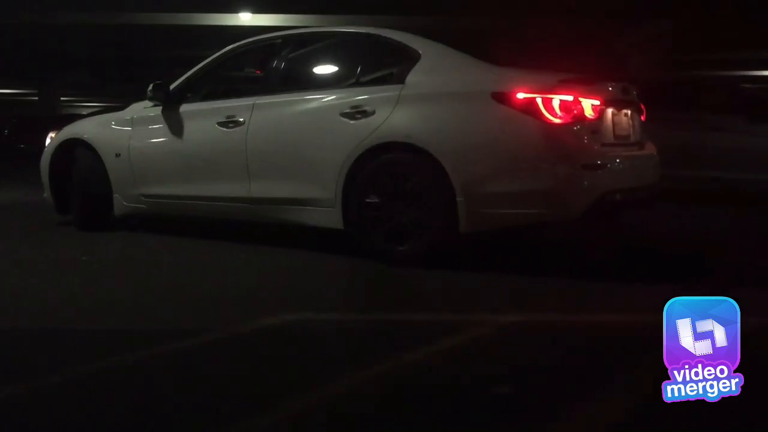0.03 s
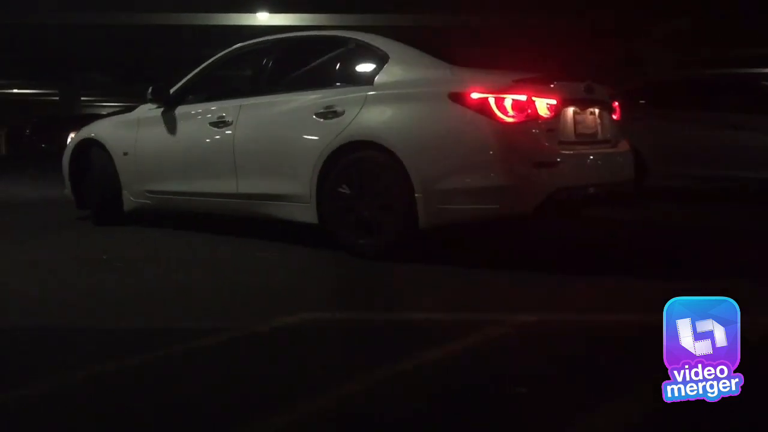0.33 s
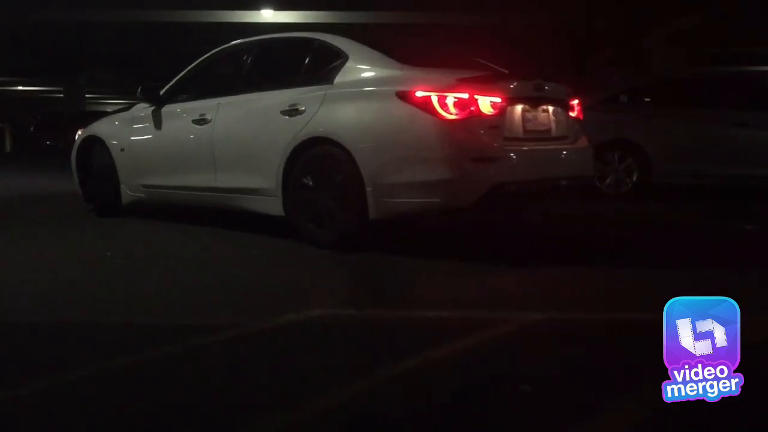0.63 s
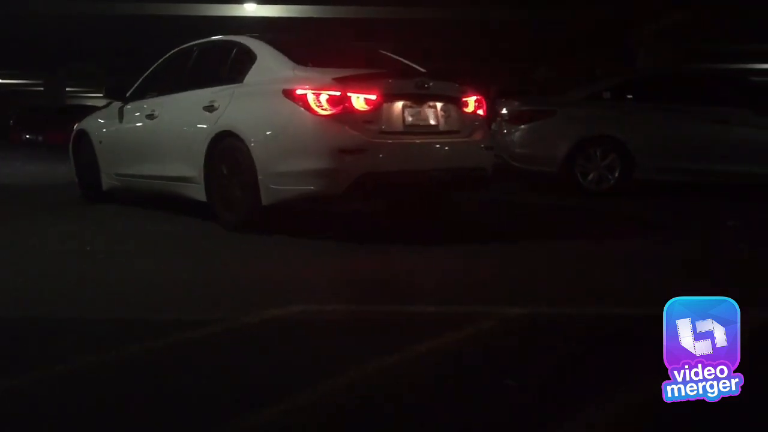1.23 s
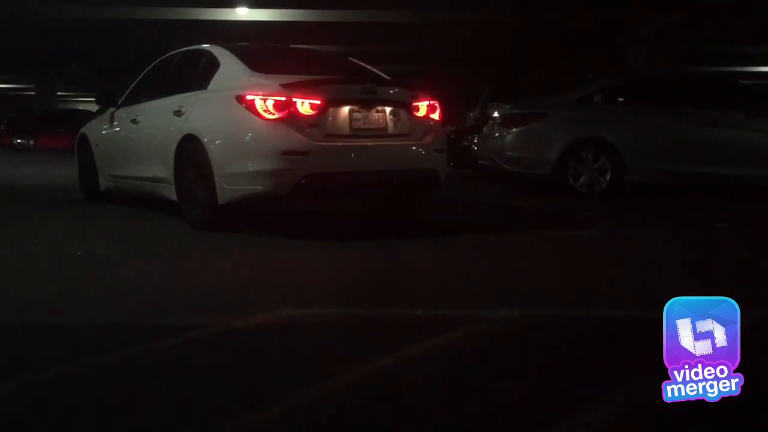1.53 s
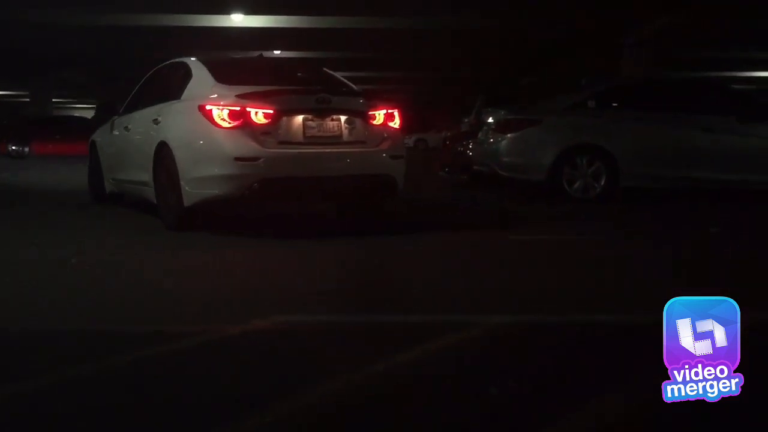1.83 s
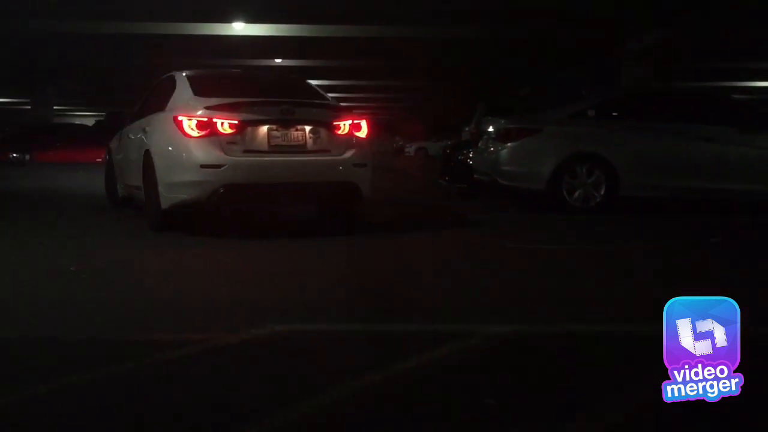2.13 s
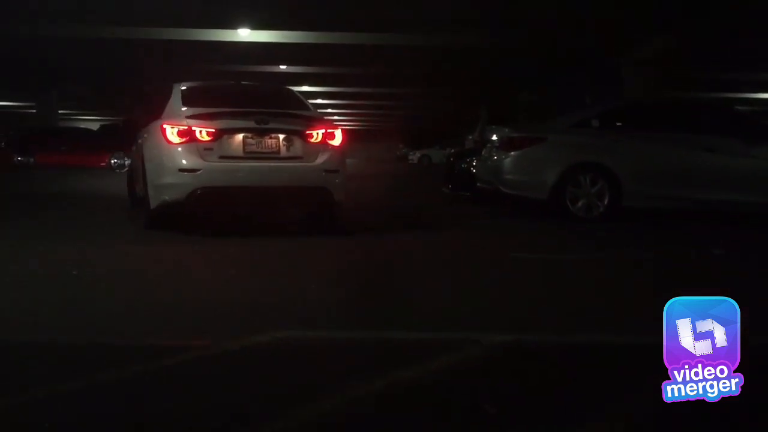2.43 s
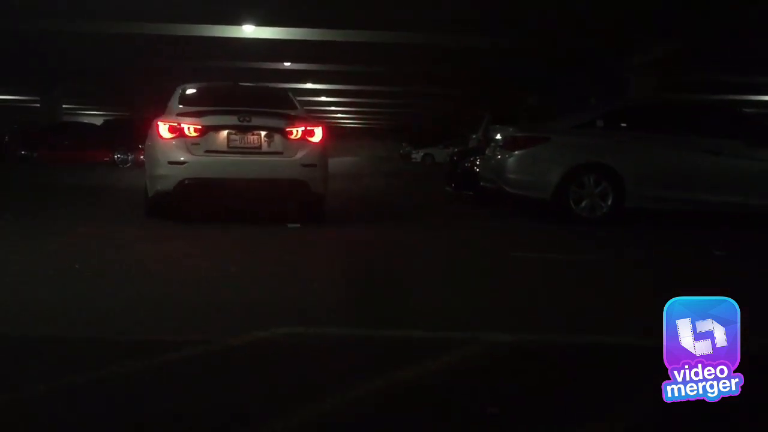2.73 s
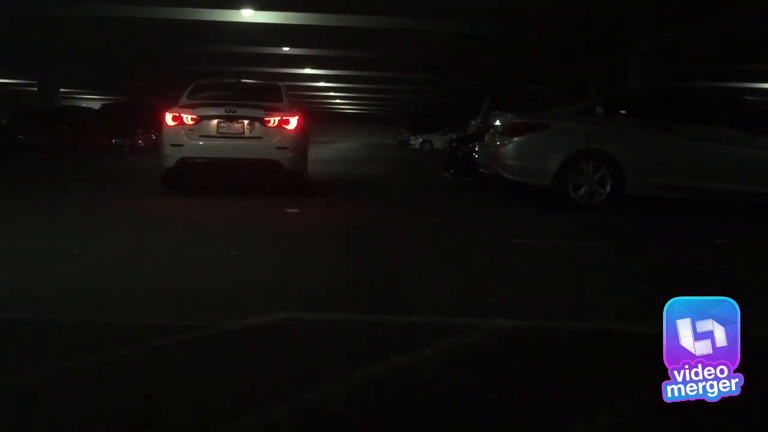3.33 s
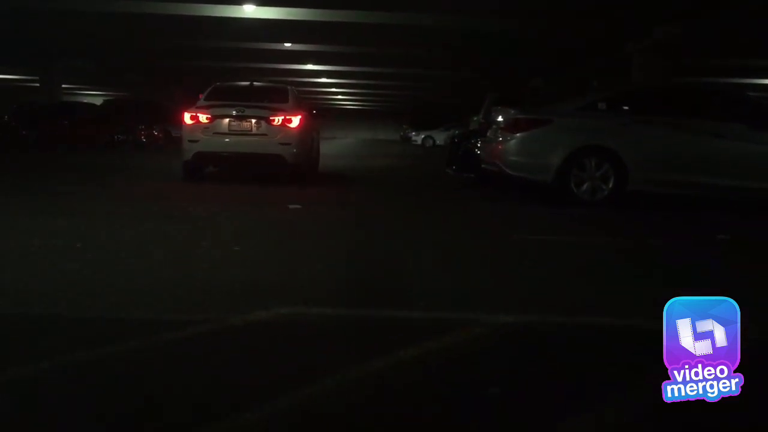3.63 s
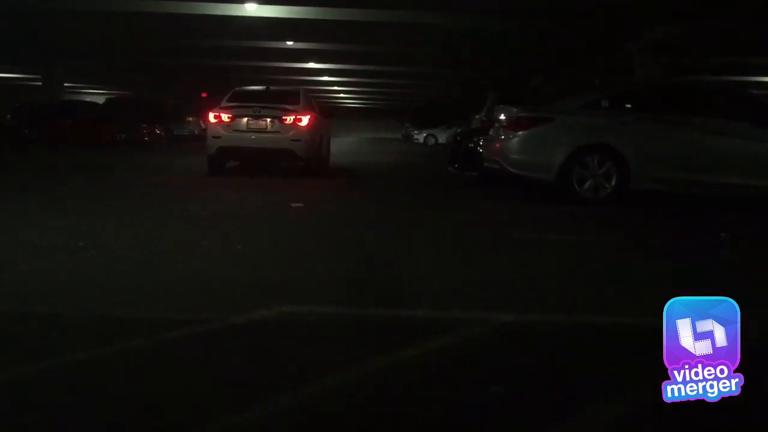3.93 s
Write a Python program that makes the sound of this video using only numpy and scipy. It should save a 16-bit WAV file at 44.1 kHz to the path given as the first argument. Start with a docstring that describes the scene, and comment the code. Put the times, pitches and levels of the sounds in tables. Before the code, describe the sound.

Car exhaust rumbling in an echoing parking garage, rising into a louder, popping growl.

```python
"""A six-cylinder car with a loud exhaust pulls away in a concrete parking garage.
The lowest harmonics of the firing boom in turn as they sweep through the exhaust's resonance;
uneven pulses burble, then rasp, growl and pop as the throttle opens. The tyres sing faintly
through a turn and snap over grit, above a wash of engine bay and ventilation."""
import sys
import numpy as np
from scipy import signal
from scipy.fft import rfft, irfft
from scipy.io import wavfile
from scipy.ndimage import uniform_filter1d, minimum_filter1d

SR = 44100
rng = np.random.default_rng(int(sys.argv[2]) if len(sys.argv) > 2 else 0)


def transcribe(u):
    """Save the signal u as a 16-bit wav file named by the first command-line argument.

    u: samples, shape (n,) or (channels, n), limited to [-1, 1]; the rate is SR.
    q: integer samples, one column per channel.
    """
    v = np.clip(np.atleast_2d(u).T, -1, 1)
    q = np.round(v * 32767).astype(np.int16)
    wavfile.write(sys.argv[1], SR, q)


N = 176400
T = np.arange(N) / SR


def amp(db):
    """Decibels to gain."""
    return 10 ** (np.asarray(db) / 20)


def unit(x):
    """Scales to rms 1."""
    return x / np.sqrt(np.mean(x ** 2) + 1e-20)


def steady(x):
    """Rides the slow level to rms 1."""
    power = uniform_filter1d(uniform_filter1d(x ** 2, size=6000), size=6000)
    return x / np.sqrt(abs(power) + 1e-14)


def curve(table, column=1):
    """One column of a time table as an automation lane."""
    rows = np.array(table, float)
    return np.interp(T, rows[:, 0], rows[:, column])


def read(points, hz):
    """Looks up a spectrum table on a log-frequency axis."""
    f, value = np.transpose(points)
    return np.interp(np.log(hz + 1), np.log(f + 1), value)


def add(mix, start_s, sound):
    """Drops a sound into the mix."""
    part = mix[round(start_s * SR):][:len(sound)]
    part += sound[:len(part)]


def colour(x, eq):
    """Minimum-phase EQ."""
    log_gain = np.log(amp(read(eq, abs(np.fft.fftfreq(8192, 1 / SR)))))
    taps = np.fft.ifft(np.exp(np.conj(signal.hilbert(log_gain)))).real[:4096]
    return signal.fftconvolve(x, taps)[:len(x)]


def band(x, hz, octaves):
    """A bell-shaped band around hz."""
    f = np.fft.rfftfreq(len(x), 1 / SR)
    return irfft(rfft(x) / (1 + (np.log2((f + 1) / hz) / octaves) ** 2), len(x))


def wander(rate_hz):
    """Smooth random modulation of rms 1."""
    f = np.fft.rfftfreq(N, 1 / SR)
    return unit(irfft(rfft(rng.standard_normal(N)) * np.exp(-(f / rate_hz) ** 2), N))


# garage reverb (frequency [Hz], decay by 60 dB [s])
GARAGE_DECAY = [(60,1.6),(250,2.6),(1000,3.3),(4000,1.1),(12000,0.54)]


def garage(x, wet_db):
    """Direct sound plus a dense concrete echo that is already ringing at the start."""
    hz, t, noise = signal.stft(rng.standard_normal(SR), SR, nperseg=256)
    decay = amp(-60 * t / read(GARAGE_DECAY, hz)[:, None])
    tail = signal.istft(noise * decay, SR, nperseg=256)[1]
    tail[:200] = 0  # pre-delay
    lead = SR // 3
    primed = np.r_[x[:lead][::-1], x]
    echo = signal.fftconvolve(primed, tail / np.linalg.norm(tail))[lead:lead + N]
    return x + amp(wet_db) * echo


# the revs (time [s], firing rate [Hz])
FIRING_RATE = [(0,34.6),(.3,39.7),(.52,42.4),(.9,42.3),(1.25,44.9),(1.5,47.2),(1.75,56.6),(2,59),(2.25,64.7),(2.5,71.5),(2.76,80),(3.02,84.8),(3.24,95.2),(3.5,108.3),(3.75,125),(4,133.2)]


def firing_phase():
    """The engine revs up with a slight waver; the phase gains 1 per firing."""
    return np.cumsum(curve(FIRING_RATE) * (1 + .002 * wander(rate_hz=13))) / SR


# faders for firing harmonics 1-5 and the sub-tone at half the rate (time [s], level [dB])
FIRST = [(0,-53),(.3,-53),(.5,-39),(1.0,-42.5),(1.25,-32.5),(1.6,-35),(1.761,-26.5),(1.901,-32),(2.2,-30.5),(2.55,-29),(2.721,-54),(2.92,-30),(3.17,-19),(3.4,-25),(3.55,-12),(3.66,-10),(3.78,-14),(3.88,-11.5),(4,-13.5)]
SECOND = [(0,-36),(.28,-39.5),(.35,-49.5),(1.1,-51),(1.3,-41),(1.52,-46.5),(1.65,-27.5),(1.96,-20.5),(2.02,-19.5),(2.06,-11.5),(2.12,-14.5),(2.25,-12),(2.34,-15.5),(2.38,-27.5),(2.42,-16.5),(2.45,-23),(2.51,-19.5),(2.545,-24),(2.61,-18.5),(2.68,-16.5),(2.83,-32.5),(2.92,-22),(3.3,-26.5),(3.7,-26.5),(3.85,-23.5),(4,-28)]
THIRD = [(0,-36.5),(.24,-32),(.29,-25),(.42,-23.5),(.46,-34.5),(.5,-19.5),(.58,-17.5),(.78,-19),(1.0,-17),(1.07,-26),(1.12,-19),(1.169,-28.5),(1.25,-17),(1.301,-39.5),(1.36,-25.5),(1.42,-20),(1.46,-33),(1.5,-23),(1.62,-24.5),(1.8,-35.5),(2.6,-33),(3,-22.5),(3.3,-36),(4,-33.5)]
FOURTH = [(0,-34.5),(.5,-38),(1.7,-45),(2.1,-32),(2.6,-38),(3,-35),(3.5,-36.5),(4,-36.5)]
FIFTH = [(0,-53.5),(2.4,-50),(2.65,-41),(3,-34),(3.2,-47.5),(3.42,-31.5),(3.55,-23.5),(3.65,-23.5),(3.73,-35.5),(3.85,-30.5),(4,-36)]
SUB = [(0,-78),(3.3,-56),(3.55,-41),(3.85,-40.5),(4,-41)]
# tones from unequal cylinder banks (time [s], order 1.5 level [dB], order 2.5 level [dB])
BANKS = [(0,-47,-49),(1.2,-52.5,-48),(1.65,-49.5,-33.5),(2.3,-53.5,-47),(2.6,-42,-46),(2.92,-30.5,-51),(3.12,-21,-46),(3.35,-35,-32.5),(3.55,-42,-28),(3.7,-46.5,-50.5),(4,-48,-52.5)]
# uneven firing under load (time [s], roughness [0-1])
UNEVEN = [(0,.3),(.4,.05),(1,.05),(1.3,.2),(1.8,.35),(2.15,.15),(2.5,.3),(2.9,.5),(3.5,.6),(3.8,.4),(4,.35)]


def boom(phase, waver_db=.7):
    """The lowest engine tones swell in turn; uneven firing roughens most of them."""
    out = np.zeros(N)
    # (multiple of the firing rate, level [dB], roughness weight)
    tones = [(.5, curve(SUB), 1), (1, curve(FIRST), 0), (1.5, curve(BANKS), 0),
             (2, curve(SECOND), 1), (2.5, curve(BANKS, column=2), 1), (3, curve(THIRD), 1),
             (4, curve(FOURTH), 2), (5, curve(FIFTH), .6)]
    for order, db, weight in tones:
        rough = weight * curve(UNEVEN)
        shake = (wander(rate_hz=20) + 1j * wander(rate_hz=30)) / np.sqrt(2)
        flutter = (1 + rough * shake) / np.sqrt(1 + rough ** 2)
        tone = np.sqrt(2) * (flutter * np.exp(2j * np.pi * order * phase)).imag
        out += amp(db + waver_db * wander(rate_hz=38)) * tone
    return out


# accent of each cylinder in firing order (level [dB])
CYLINDERS = [3.5,-2,1,-3,-0.9,1]


def firings(phase, jitter_s):
    """Cylinders fire in turn: each firing's sample, accent and random spread."""
    at = np.flatnonzero(np.diff(np.floor(phase)))
    chance, late = rng.standard_normal((len(at), 2)).T
    at += np.round(late * jitter_s * SR).astype(int)
    return np.clip(at, 0, N - 1), np.resize(CYLINDERS, len(at)), chance


# burble fader (time [s], level [dB])
BURBLE_LEVEL = [(0,-27.5),(.3,-37),(.6,-35),(1,-35),(1.3,-33.5),(1.65,-26),(2.1,-28),(2.6,-26.5),(3.1,-26.5),(3.45,-26),(3.7,-22),(4,-35.5)]
# the pipe's deep resonance (frequency [Hz], gain [dB])
BURBLE_EQ = [(20,-52),(55,-16.5),(80,-8),(105,-8),(128,15),(165,-3),(210,-13),(280,-21),(500,-63),(2500,-100)]


def burble(phase, habit=.19):
    """Firings overshoot or fall short and ring the pipe: partly cylinder habit, mostly chance."""
    at, accent_db, chance = firings(phase, jitter_s=.0009)
    pulses = np.zeros(N)
    pulses[at] = chance + habit * (accent_db - np.mean(CYLINDERS))
    return steady(garage(colour(pulses, BURBLE_EQ), wet_db=3)) * amp(curve(BURBLE_LEVEL))


# throttle faders (time [s], low rasp [dB], high rasp [dB], hiss [dB], mid rasp [dB])
THROTTLE = [(0,-47,-53,-73,-54),(.7,-56,-66,-83.5,-56.5),(1.3,-51.5,-51.5,-76,-59.5),(1.8,-48.5,-45.5,-69,-54.5),(2.3,-50,-50.5,-72,-57.5),(2.55,-36,-51,-67,-49),(2.8,-31,-45,-61,-36),(3.15,-25.5,-37.5,-58.5,-39.5),(3.4,-26.5,-31,-54.5,-27.5),(3.62,-22,-31,-50,-27),(3.72,-31.5,-33,-53.5,-34.5),(4,-29.5,-35.5,-61.5,-32)]
# tone of the pipe's three rasps and the gas hiss (frequency [Hz], gain [dB])
LOW_EQ = [(100,-48),(180,-16.5),(255,7),(315,-8.5),(385,-7),(490,-14),(700,-31),(1500,-71),(5000,-100)]
MID_EQ = [(150,-46.5),(300,-7),(385,0.5),(470,1),(560,-2),(660,-12.5),(900,-28.5),(3000,-80.5)]
HIGH_EQ = [(200,-56.5),(380,-13),(480,-6),(580,-4),(690,0),(800,-9.5),(1200,-8),(1550,-16),(1900,-29),(3000,-36),(6000,-63.5),(11000,-100)]
HISS_EQ = [(700,-31.5),(1800,0.5),(3000,-0.5),(4500,1.5),(6400,-3),(7300,-11.5),(10000,-19.5),(16000,-28.5)]


def exhaust_rasp(phase):
    """Firing pulses ring the pipe in three bands; gas hisses out with each one."""
    def ring(eq, scatter_db, jitter_s):
        at, accent_db, chance = firings(phase, jitter_s)
        pulses = np.zeros(N)
        pulses[at] = amp(accent_db + scatter_db * chance)
        return colour(pulses, eq)

    low = garage(ring(LOW_EQ, scatter_db=4, jitter_s=.0003), wet_db=1.5)
    mid = garage(ring(MID_EQ, scatter_db=2.5, jitter_s=.00008), wet_db=-1.5)
    high = garage(ring(HIGH_EQ, scatter_db=2.8, jitter_s=.00007), wet_db=0)
    puffs = rng.standard_normal(N) * np.exp(-(phase % 1) / .72)
    hiss = garage(colour(puffs, HISS_EQ), wet_db=-2.5)
    return sum(steady(layer) * amp(curve(THROTTLE, column))
               for column, layer in enumerate([low, high, hiss, mid], start=1))


# tyre song (time [s], level [dB], pitch [Hz])
SCRUB = [(0,-49.5,997),(.3,-52.5,1023),(.6,-66,1095),(.85,-64.5,1230),(1.08,-53.5,1240),(1.45,-46,1238),(1.6,-49.5,1230),(1.9,-64,1240),(4,-84.5,1240)]


def tyre_scrub(spread_hz=82, rub_db=-4):
    """Rubber sings faintly through the turn: a blurred tone with broad rubbing noise."""
    angle = 2 * np.pi * np.cumsum(curve(SCRUB, column=2)) / SR
    tone = unit(wander(spread_hz) * np.sin(angle) + wander(spread_hz) * np.cos(angle))
    rub = unit(band(rng.standard_normal(N), hz=1300, octaves=.38))
    return (tone + amp(rub_db) * rub) * amp(curve(SCRUB))


# tone of the background bed (frequency [Hz], gain [dB])
AMBIENCE_EQ = [(25,-16.5),(45,6.5),(120,4),(235,3.5),(295,-4),(370,4),(470,-7.5),(560,-7),(680,-3),(1000,-5),(1400,-7.5),(2000,-13),(3200,-16),(4500,-26.5),(6500,-35),(8000,-40),(11000,-41.5),(15500,-40.5)]


def ambience(level_db=-43):
    """Diffuse wash of engine bay and ventilation."""
    wash = unit(colour(rng.standard_normal(N), AMBIENCE_EQ))
    return wash * amp(level_db + 1.4 * wander(rate_hz=18))


# dust fader (time [s], level [dB])
DUST_LEVEL = [(0,-71),(.5,-63.5),(.7,-77),(1.4,-76),(1.8,-67.5),(2.3,-69.5),(2.7,-77),(3.5,-71.5),(4,-62)]


def dust(grains_per_s=700):
    """Fine dust crackles under the tyres."""
    hits = rng.random(N) < grains_per_s / SR
    grain_db = 4 * np.minimum(rng.exponential(1, N), 3) + 3 * wander(rate_hz=12)
    crackle = colour(hits * amp(grain_db), eq=[(1000, -32.5), (3000, .5), (7000, -6), (16000, -17)])
    return unit(garage(crackle, wet_db=1.5)) * amp(curve(DUST_LEVEL))


# grit hits (time [s], dry peak [dB], centre [Hz], half-width [octaves], decay [s])
GRIT = [(0.495,-38.5,2200,0.45,0.0019),(.5487,-24.5,2400,.7,.0011),(0.553,-26,2150,.65,.0018),(.5604,-32,2045,.5,.005),(.911,-37.5,2700,0.87,.007),(.914,-53,9300,.3,0.0049),(1.018,-47,3488,1.1,0.0033),(1.486,-48.5,5300,.55,.003),(1.734,-51,8300,.3,0.0065),(2.137,-33.5,4200,.6,.003),(2.155,-38.5,4000,.85,.003)]


def grit(attack_share=.14):
    """Grit snaps or crumbles under the tread in short, bright bursts."""
    out, t, f = np.zeros(N), np.arange(2048) / SR, np.fft.rfftfreq(2048, 1 / SR)
    for start_s, db, hz, octaves, decay_s in GRIT:
        bell = np.exp(-(np.log2((f + 1) / hz) / octaves) ** 2)
        crunch = irfft(rfft(rng.standard_normal(len(t))) * bell)
        snap = crunch * (1 - np.exp(-t / (attack_share * decay_s))) * np.exp(-t / decay_s)
        add(out, start_s, amp(db) * snap / abs(snap).max())
    return garage(out, wet_db=-15)


# growl fader (time [s], gain [dB])
GROWL_GAIN = [(0,-63.5),(1.7,-56),(2.05,-56),(2.5,-41),(2.85,-37.5),(3.2,-38),(3.45,-31),(3.58,-23),(3.72,-33),(3.85,-31.5),(4,-34.5)]
# the pipe's resonances (frequency [Hz], gain [dB])
GROWL_EQ = [(120,3.5),(250,5.5),(310,-1),(390,1),(500,-7.5),(580,3.5),(670,-2),(780,-5.5),(920,-6),(1050,-13.5),(1200,-12),(1400,-28.5),(1700,-21)]


def growl(phase, half_order_db=-9, open_hz=127):
    """Upper whole and half orders slide through the pipe's resonances; higher ones flutter more."""
    firing_hz, out = curve(FIRING_RATE), np.zeros(N)
    tilt_db = 13.5 * np.clip(1 - firing_hz / open_hz, 0, 1)  # per order: duller at low revs
    orders = np.arange(5.5, 14, .5)
    for order in orders:
        db = read(GROWL_EQ, order * firing_hz) + half_order_db * (order % 1 > 0)
        db -= tilt_db * (order - orders[0])
        rough = order / 18
        angle = 2 * np.pi * (order * phase + rng.random())
        flutter = wander(rate_hz=25) * np.sin(angle) + wander(rate_hz=34) * np.cos(angle)
        out += amp(db) * (np.sin(angle) + rough * flutter) / np.sqrt(1 + 2 * rough ** 2)
    return garage(out * amp(curve(GROWL_GAIN)), wet_db=-8.5)


# exhaust pops (time [s], dry peak [dB])
POPS = [(3.036,-21.5),(3.283,-12),(3.344,-8.5),(3.403,-5.5),(3.470,-11.5)]
# body of a pop (frequency [Hz], gain [dB])
POP_EQ = [(60,-18),(300,-3),(600,0),(1100,-12),(2000,-22.5),(6000,-52)]


def pops(width_s=.0006):
    """Single hard pressure pulses from the tailpipe."""
    out, age = np.zeros(N), np.arange(2048) / SR / width_s
    pulse = colour(age * (2 - age) * np.exp(-age), POP_EQ)
    for start_s, db in POPS:
        add(out, start_s, -amp(db) * pulse / abs(pulse).max())
    return garage(out, wet_db=-7.5)


def scene():
    """Mono mix: four layers locked to the revs, plus pops, tyres and the background bed."""
    phase = firing_phase()
    engine = boom(phase) + growl(phase) + burble(phase) + exhaust_rasp(phase)
    return (engine + pops() + grit() + tyre_scrub() + ambience() + dust())[None]


def record(dry, ceiling=.57, low_cut_hz=33, high_cut_hz=15800):
    """Microphone bass roll-off, a peak limiter and a steep high cut."""
    x = signal.sosfilt(signal.butter(4, low_cut_hz, "highpass", fs=SR, output="sos"), dry)
    gain = minimum_filter1d(np.minimum(1, ceiling / (abs(x) + 1e-9)), size=801)
    limited = x * uniform_filter1d(uniform_filter1d(gain, size=401), size=401)
    high_cut = signal.firwin(511, high_cut_hz, window=("kaiser", 9), fs=SR)
    return signal.oaconvolve(limited, high_cut[None], "same")


dry = scene()
out = record(dry)
transcribe(out)
```